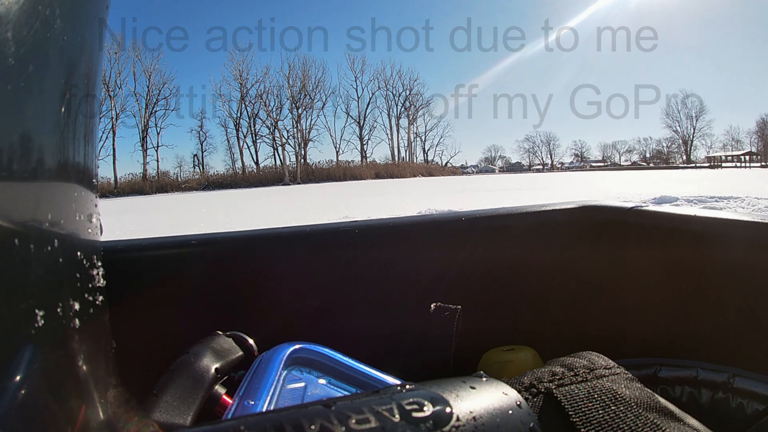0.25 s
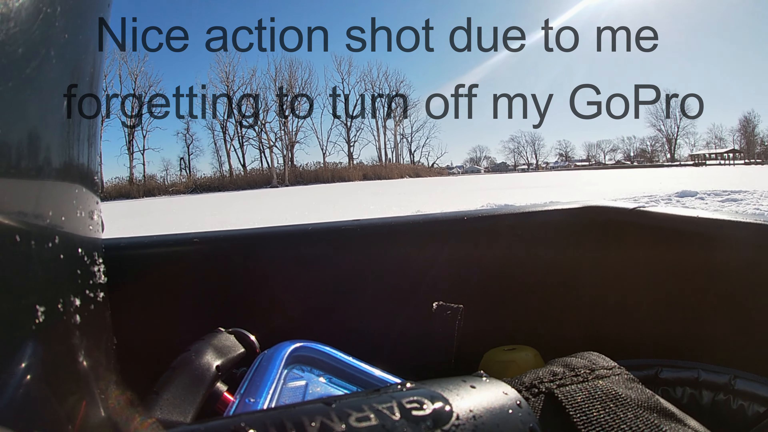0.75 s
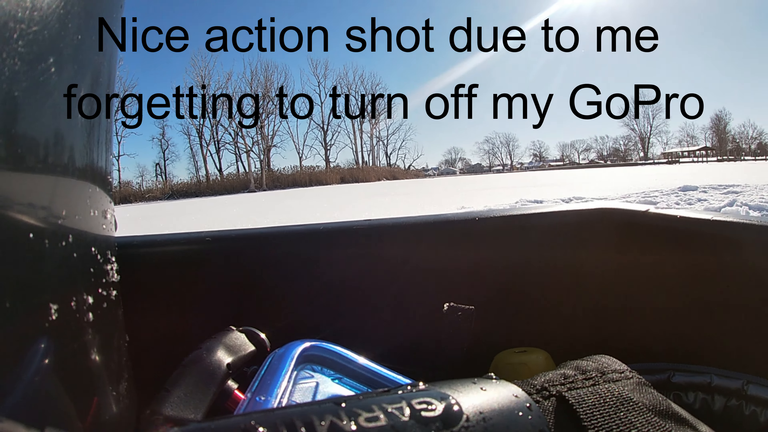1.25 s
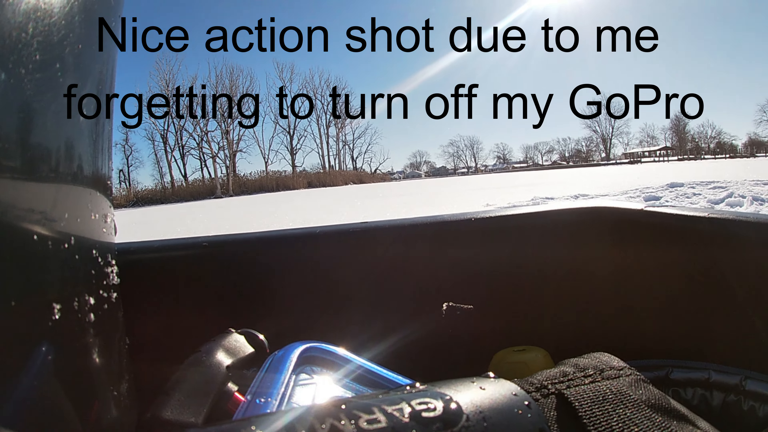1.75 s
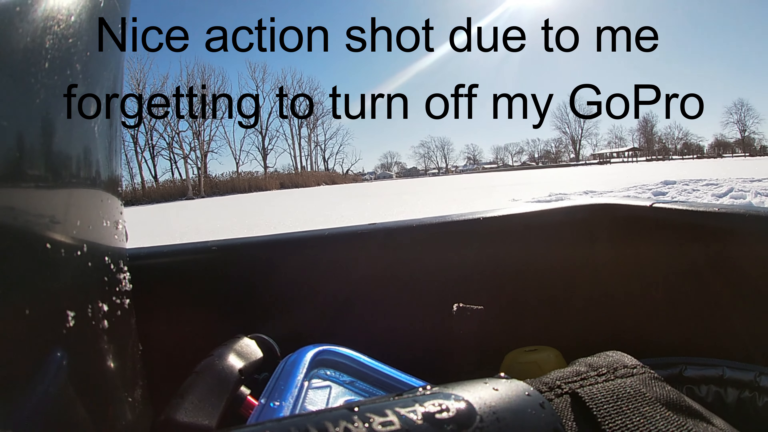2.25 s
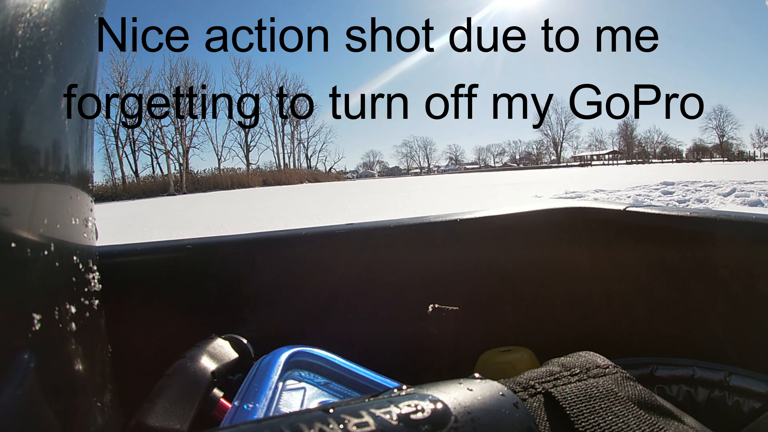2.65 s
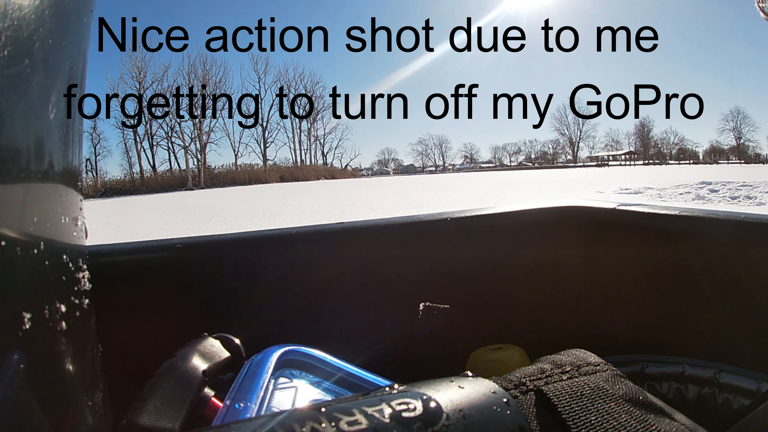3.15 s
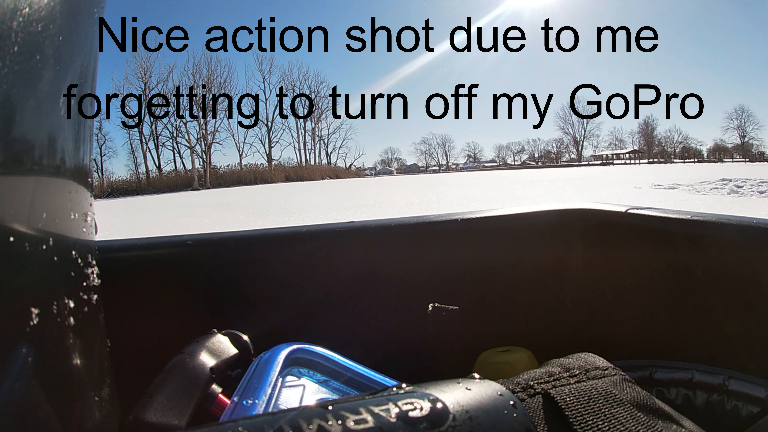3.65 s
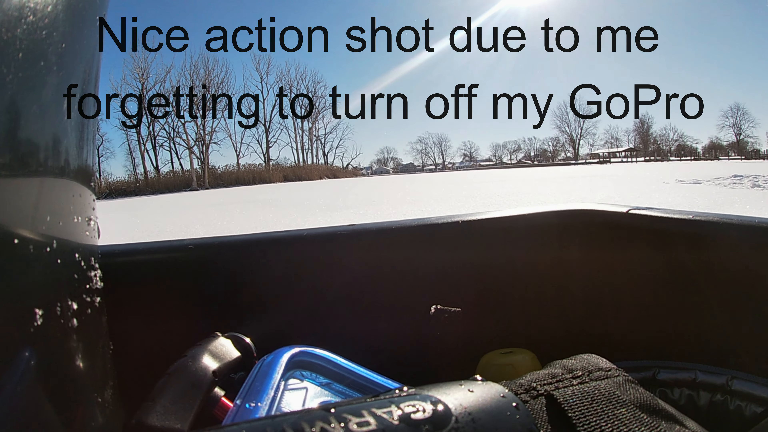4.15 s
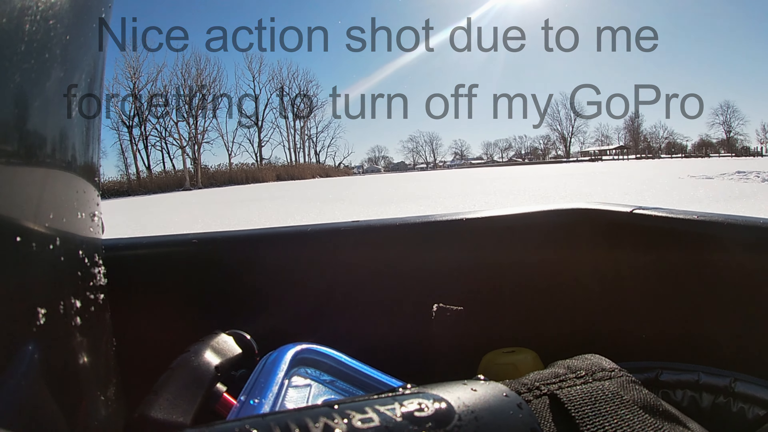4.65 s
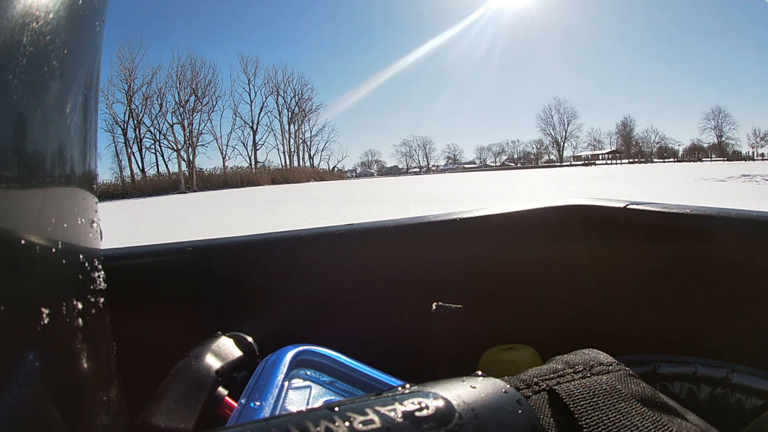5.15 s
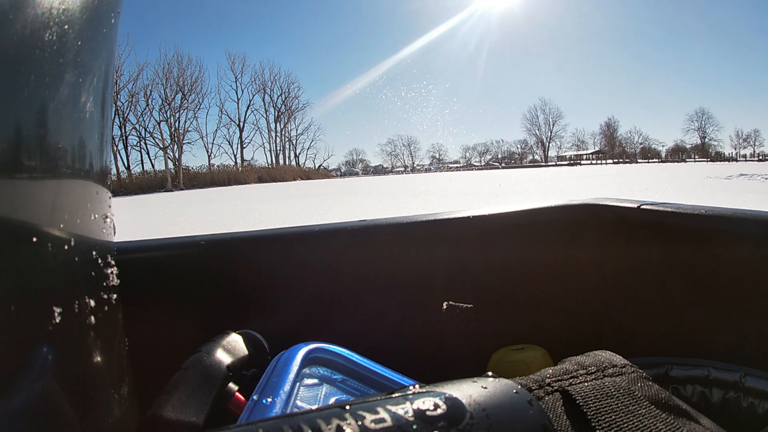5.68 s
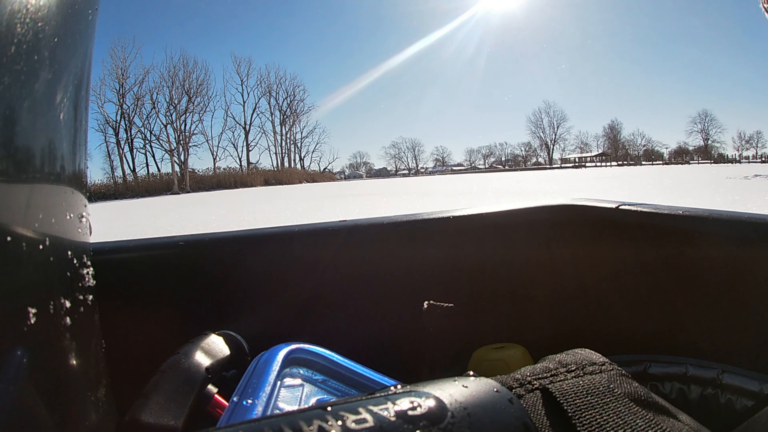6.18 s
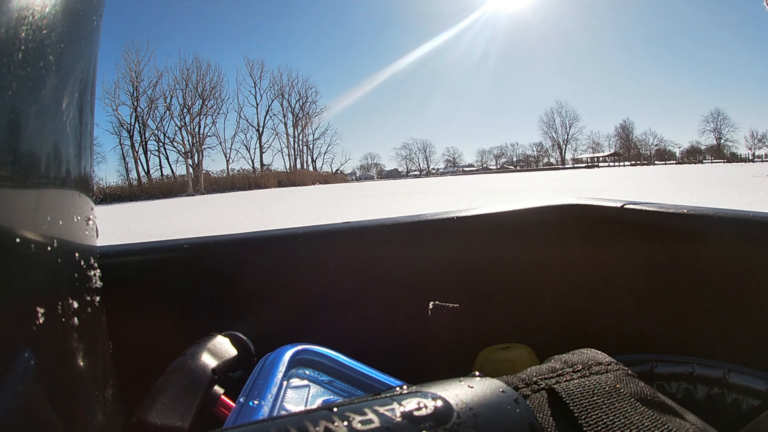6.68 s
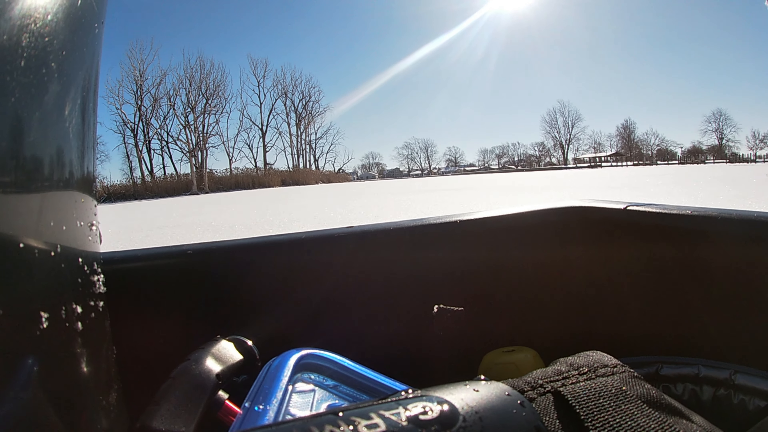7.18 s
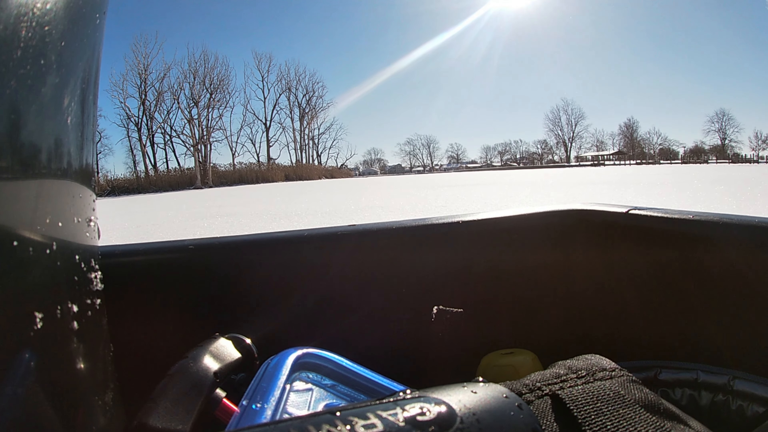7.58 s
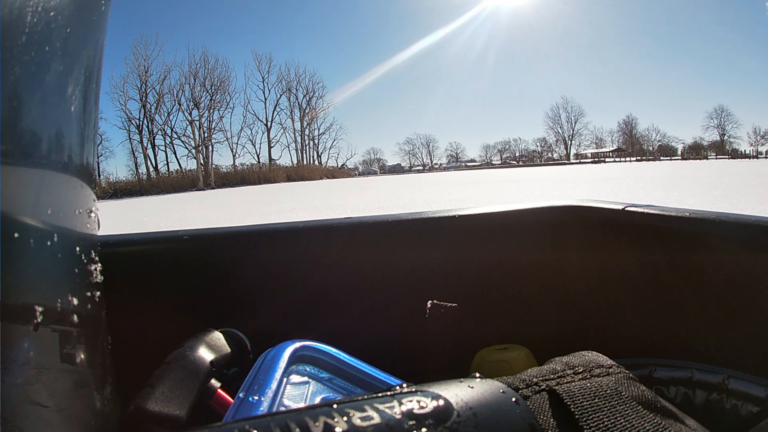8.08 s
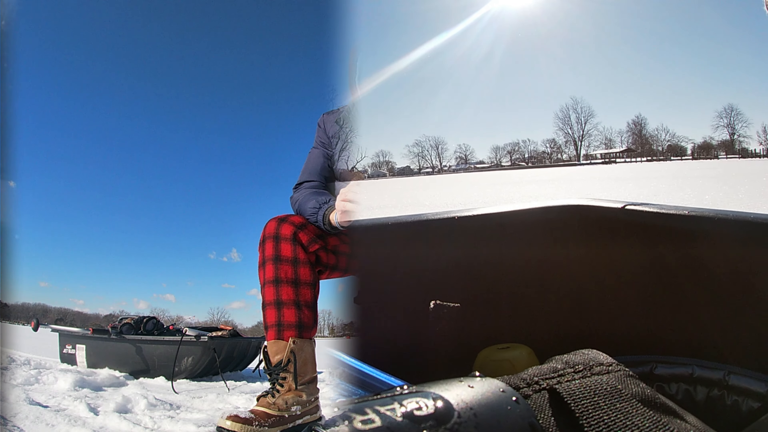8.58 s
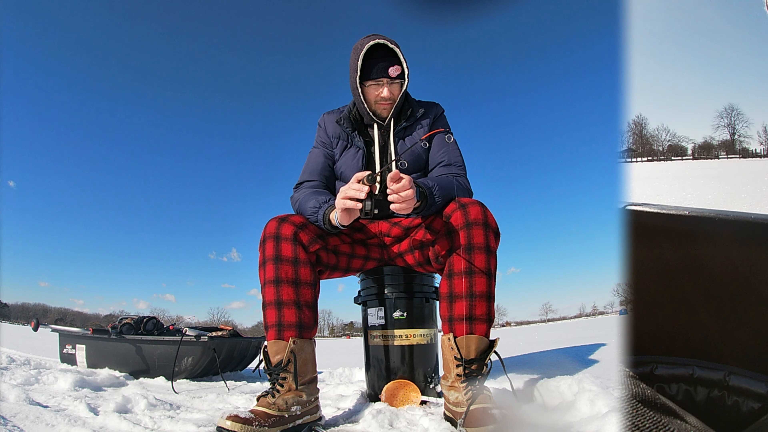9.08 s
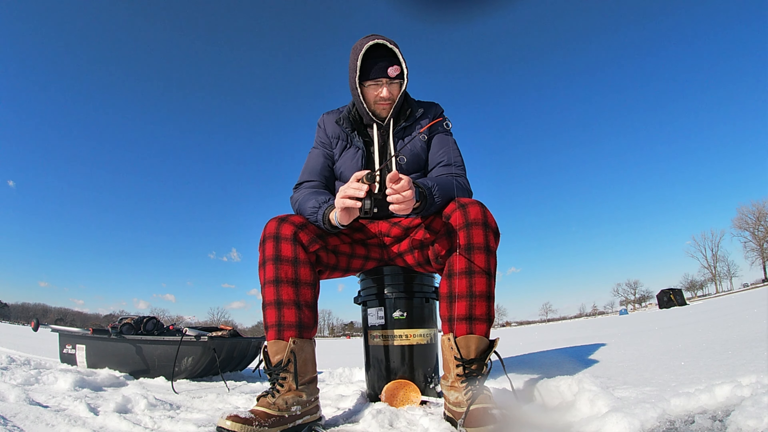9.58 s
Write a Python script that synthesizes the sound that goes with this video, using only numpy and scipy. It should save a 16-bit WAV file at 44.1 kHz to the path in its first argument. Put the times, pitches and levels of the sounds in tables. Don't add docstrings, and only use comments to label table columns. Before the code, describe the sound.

From 0 s the microphone sits inside a hard plastic sled being dragged over crusty snow. A loud, hollow low drone shakes unevenly, strongest around 200 to 400 hertz, with gritty scraping and a thinner icy hiss. Loose gear knocks the tub at roughly 0.4, 1.0, 1.4, 1.6, 2.1 and 2.7 s, with short boxy clacks and some bright rod rings. Sharper blows come at 3.9, 4.85, 5.6, 7.2 and 8.2 s, with a lighter one at 7.6; the hull shudders after thumps and scraping often ducks briefly. Ridges add dull jolts between. From 8.15 s the ride fades fast, cutting with a click at 8.72. After about 0.03 s of silence, only bassy wind buffets an exposed microphone on the ice, sagging and surging, with tearing flutters densest near 9.4 to 9.5 s, tiny ticks and a very faint rush, before cutting off abruptly around 9.8 s.

```python
import sys
import numpy as np
from scipy import signal
from scipy.fft import rfft, irfft, next_fast_len
from scipy.io import wavfile
from scipy.ndimage import uniform_filter1d

SR = 44100
rng = np.random.default_rng(int(sys.argv[2]) if len(sys.argv) > 2 else 0)


def convert_level_to_amplitude(level_db):
    exponent = np.asarray(level_db, float) / 20
    return 10 ** exponent


def materialize(psi):
    bounded = np.clip(np.atleast_2d(psi).T, -1, 1)
    quanta = np.round(bounded * 32767).astype(np.int16)
    wavfile.write(sys.argv[1], SR, quanta)


N = 433503

# f/Hz, density/dB per Hz
SLED_SPECTRUM = [(15, -43), (25, -8.5), (113, -12), (215, 2), (290, -4), (400, -6), (667, -18), (947, -17),
                 (1340, -25), (1760, -24.5), (2430, -31), (5300, -31), (7320, -43), (9850, -45.5),
                 (15600, -69.5)]
# f/Hz, width/Hz, boost/dB
HULL_MODES = [(172.6, 19, 0.5), (234.7, 46, 4), (296.7, 22, 6), (400, 67, 1.5), (970, 85, -2),
              (1550, 600, 2.5), (2175, 200, -2), (4040, 230, 2), (5200, 530, 0.5), (10100, 1700, 2)]
# t/s, speed/dB, load on the crust/dB, upper over lower hull modes/dB
HAUL = [(0, 4.5, 0.5, -0.5), (.2, 3, -1.5, 8), (.5, 3.5, -2, 10.5), (.9, 0.5, -1, 6.5), (1.35, 1.5, 1, 3),
        (1.9, -1.5, -1.5, 0.5), (2.4, -0.5, -2.5, -4), (3.0, -2, -3.5, -5.5), (3.2, 0, -1, -0.5),
        (3.5, .5, -1.5, -2.5), (4.25, 1.5, -0.5, -5), (4.6, -0.5, -3, 3), (5.2, -2, -3.5, -3),
        (5.4, 0, 1, 0), (6.1, -0.5, 0, 1.5), (6.5, 2.5, 0, -1.5), (7.7, 0.5, -0.5, 1.5), (8.7, 2.5, -1, 2)]
LAYER_DB = [-33.5, -22.5, -33.5, -38]
PER_SPEED = [.3, .1, 1.1, 0.57]
PER_LOAD = [0.8, 1.5, 0.16, 0.061]
PER_TENSION = [.3, 1, 0.45, 0.65]
PER_DUCK = [.3, .4, .9, 1.02]


def drag():
    speed_db, load_db, flex_db = curve(HAUL)
    tension_db, duck_db = tugs()
    fade_start_s, fade_db_per_s = 8.147, 21
    fade_db = -fade_db_per_s * np.maximum(np.arange(N) / SR - fade_start_s, 0)
    levels = []
    for db, a, b, c, d in zip(LAYER_DB, PER_SPEED, PER_LOAD, PER_TENSION, PER_DUCK):
        levels.append(db + a * speed_db + b * load_db + c * tension_db + d * duck_db + fade_db)
    thud_db, hull_db, scrape_db, hiss_db = levels
    ground = walk(30)
    lumps = grains(260, 2.2, 1.21)

    thud = even(colour(grains(66, 2.5, 0.89), SLED_SPECTRUM, [], 19, 161), 0.18, 0.28)
    thud = thud * (convert_level_to_amplitude(thud_db + 1.4 * walk(7.3)) + shudder())

    flex = convert_level_to_amplitude(flex_db / 2)
    lower = colour(lumps, SLED_SPECTRUM, HULL_MODES, 130, 250)
    upper = colour(lumps, SLED_SPECTRUM, HULL_MODES, 297, 600)
    tub = lower / flex + flex * upper
    hull = even(tub * convert_level_to_amplitude(2.6 * ground), 0.026, 0.29) * convert_level_to_amplitude(hull_db)

    scrape = colour(0.29 * lumps + grains(1500, 0.97, 2.6), SLED_SPECTRUM, HULL_MODES, 527, 2700)
    cavity_mode = (947, 120, 14)  # f/Hz, width/Hz, boost/dB
    cavity = colour(lumps, SLED_SPECTRUM, [cavity_mode], 780, 1300)
    scrape = scrape + cavity * convert_level_to_amplitude(-10 - 0.53 * flex_db)
    scrape = scrape * convert_level_to_amplitude(scrape_db + 0.31 * ground + 1.1 * walk(40))

    hiss = colour(grains(5000, 4.5, 2.1), SLED_SPECTRUM, HULL_MODES, 2030, 17000)
    hiss = hiss * convert_level_to_amplitude(hiss_db + 0.092 * ground + 0.6 * walk(60))
    return thud + hull + scrape + hiss


# t/s, build-up before/dB, slack after (negative stays taut)/dB, gain duck (negative lifts)/dB
TUGS = [
    (.97, 4.5, 0, -3),
    (1.62, 0.5, 3.5, -2),
    (2.07, 3.5, -3, 0.5),
    (2.18, 2, 1, -1.2),
    (2.745, 5, -3.5, 1),
    (3.894, 4.5, 2.5, 5.5),
    (4.84, 6, 1.5, -3.5),
    (5.59, -0.5, 7.5, -3.5),
    (7.15, 3, 2.5, -3.6),
    (8.17, 3.5, 1.5, -2),
]


def tugs():
    build_s, slack_s = 0.24, 0.55
    hold_s, release_s = 0.03, 0.045
    tension_db, duck_db = 0, 0
    t = np.arange(N // 32 + 1) * 32 / SR
    for s, before_db, after_db, depth_db in TUGS:
        d = t - s
        build = before_db * np.exp(-np.abs(d) / build_s)
        slack = -after_db * np.exp(-np.abs(d) / slack_s)
        tension_db = tension_db + np.where(d < 0, build, slack)
        duck_db = duck_db - depth_db * (d > 0) * np.exp(-np.maximum(d - hold_s, 0) / release_s)
    tension_db = uniform_filter1d(tension_db, size=45)
    duck_db = uniform_filter1d(duck_db, size=14)
    return curve(np.transpose([t, tension_db, duck_db]))


# t/s, tub level/dB, thump level/dB, box ring level/dB, rod ring level/dB
KNOCKS = [(.368, -11, -33, -32, -28), (.968, -8, -22.5, -22.5, -31), (1.359, -10, -34, -24, -38),
          (1.616, -23, -34, -25, -25), (1.625, -4.5, -18, -24, -40), (2.06, -6.5, -16.5, -15, -14),
          (2.14, -11, -30, -34, -38), (2.74, -5.5, -41, -15.5, -21.5), (3.875, -22, -33, -20, -20),
          (3.885, -7.5, -20.5, -14.5, -11.5), (4.843, -6, -11.5, -20, -15), (4.858, -9.5, -17, -21, -41),
          (5.581, -7, -12, -29, -33), (5.592, -1.5, -14, -27, -34), (5.631, -9.5, -23.5, -32, -41),
          (7.164, -1, -13.5, -26, -21), (7.176, -7.5, -31, -23, -37), (8.178, -3, -18, -25, -27),
          (8.188, -16, -18, -23, -27), (8.199, -7, -22, -26, -34), (2.757, -9.5, -37, -26, -36),
          (2.078, -8, -29, -20, -32), (7.615, -11.5, -18, -40, -46), (8.632, -34, -26.5, -48, -54)]
# f/Hz, t60/s, level/dB
KNOCK_RINGS = [
    [(173.8, 0.057, -2.5), (250, 0.039, -5.5), (326, 0.09, -12.5), (426, 0.19, -20)],
    [(74.5, 0.088, 3.5), (44.9, .15, -8), (106, 0.13, -2)],
    [(646, 0.01, -2), (871, 0.036, 0.5), (1062, 0.029, -4.5), (1250, 0.021, -21.5)],
    [(1635, 0.036, -12), (1720, 0.015, -5), (1970, 0.027, -1.5), (2206, 0.026, -11), (2750, 0.019, -18)],
]
KNOCK_LAG_MS = [1.15, 1.1, 1.6, 0.16]


def knocks():
    contact_ms = 2.9
    out = np.zeros(N)
    t = np.arange(SR // 5) / SR
    rise = 1 - np.exp(-(t * 1000 / contact_ms) ** 2)
    chance = rng.standard_normal((len(KNOCKS), len(KNOCK_RINGS), 12))
    crack = colour(rng.standard_normal(N), SLED_SPECTRUM, [], 300, 6000)
    for (s, *part_db), luck in zip(KNOCKS, chance):
        start = s - contact_ms / 2000
        for rings, level_db, lag_ms, c in zip(KNOCK_RINGS, part_db, KNOCK_LAG_MS, luck):
            for k, (ring_hz, t60, db) in enumerate(rings):
                shape = rise * np.exp(-np.log(1000) * t / t60)
                detuned_hz = ring_hz * (1 + 0.02 * c[k])
                ring = np.sin(2 * np.pi * detuned_hz * t + c[k + 6])
                add(out, start + lag_ms / 1000, convert_level_to_amplitude(level_db + db) * ring * shape / shape.max())
        shape = rise * np.exp(-np.log(1000) * t / 0.037)
        snap = crack[int(s * SR):][:len(t)]
        add(out, start, convert_level_to_amplitude(part_db[3] - 3.0) * snap * shape / shape.max())
    return out


# t/s, thump level/dB
RIDGES = [
    (.1, -10),
    (.6, -24),
    (1.5, -20),
    (3.65, -16.5),
    (4.2, -18),
    (5.3, -8),
    (5.95, -29),
    (6.65, -20.5),
    (6.98, -11),
    (7.8, -10),
]


def shudder():
    rumble_db, rumble_s, ridge_s = -18, 0.23, 0.07
    out = np.zeros(N)
    t = np.arange(SR) / SR
    for s, _, thump_db, *_ in KNOCKS:
        add(out, s, convert_level_to_amplitude(thump_db + rumble_db) * np.exp(-t / rumble_s) * np.minimum(t / 0.03, 1))
    for s, thump_db in RIDGES:
        swell = np.e * t / ridge_s * np.exp(-t / ridge_s) / 2
        add(out, s, convert_level_to_amplitude(thump_db + rumble_db) * swell)
    return out


# f/Hz, density/dB per Hz
WIND_SPECTRUM = [(15, -30), (25, -1.5), (70, 1), (128, -8.5), (192, -20.5), (216, -20.5), (241, -27.5),
                 (289, -33.5), (447, -50.5), (492, -56.5), (1200, -85.5), (1560, -116), (2640, -120)]
# f/Hz, density/dB per Hz
RUSH_SPECTRUM = [(290, -25), (500, -7), (1060, -11), (1430, -9), (2240, -17.5), (4300, -17), (9000, -21),
                 (11700, -60.5), (19800, -120)]
# t/s, peak level/dB, width/ms
EDDIES = [(8.783, -22, 2.7), (8.8735, -17, 3.4), (9.0077, -16, 3.7), (9.087, -18, 2.2), (9.0964, -16, 2.4),
          (9.121, -17, 3.7), (9.138, -13, 2.9), (9.3065, -17, 3.7), (9.3235, -14, 3.4), (9.386, -13, 2.5),
          (9.3925, -13, 2.6), (9.4334, -13, 4), (9.443, -11, 2.2), (9.4543, -10, 3.2), (9.47, -12, 2.8),
          (9.48, -13, 3), (9.513, -14, 4), (9.65, -17, 4), (9.764, -18, 2.2)]
# t/s, peak level/dB
TICKS = [
    (8.785, -60),
    (8.886, -59),
    (9.085, -48),
    (9.119, -53.5),
    (9.318, -55),
    (9.385, -51.5),
    (9.438, -52),
    (9.474, -60),
]


def wind():
    gust_db, tear_db = gust()
    swirl = even(colour(rng.standard_normal(N), WIND_SPECTRUM, [], 22, 280), 0.068, 0.56)
    swirl = unit(swirl + 0.1 * (swirl ** 2 - 1))
    out = swirl * convert_level_to_amplitude(gust_db)
    rush = colour(rng.standard_normal(N), RUSH_SPECTRUM, [], 450, 6000)
    out += rush * convert_level_to_amplitude(-80 + 0.3 * (gust_db + 27.5) + 2.5 * walk(40))
    torn = colour(grains(190, 3.0, 0.48), WIND_SPECTRUM, [], 260, 520)
    out += torn * convert_level_to_amplitude(tear_db + 10.0)

    t = np.arange(-SR // 50, SR // 50) / SR
    for s, db, width_ms in EDDIES:
        u = (t * 1000 / width_ms) ** 2
        add(out, s + t[0], convert_level_to_amplitude(db) * (1 - 1.4 * u) * np.exp(-u))
    for s, db in TICKS:
        add(out, s + t[0], convert_level_to_amplitude(db + 5) * np.exp(-np.abs(t) / 0.0001))
    # t/s, level/dB, f/Hz, width/s
    for s, db, hz, width_s in [(9.4505, -57, 2900, 0.0008), (9.478, -46, 720, 0.003)]:
        add(out, s + t[0], convert_level_to_amplitude(db) * np.sin(2 * np.pi * hz * t) * np.exp(-(t / width_s) ** 2))
    return out


# t/s, depth/dB, sag time/s
LULLS = [
    (8.758, 10, .02),
    (8.842, 14, 0.072),
    (8.975, 11, 0.12),
    (9.03, 6.5, .05),
    (9.6, 9.5, .11),
    (9.685, 13, 0.045),
]
# t/s, peak level/dB
TEARS = [
    (9.022, -54),
    (9.094, -42),
    (9.282, -43.5),
    (9.342, -41.5),
    (9.368, -38),
    (9.392, -41),
    (9.448, -27.5),
    (9.477, -37),
    (9.761, -39.5),
]


def gust():
    buffet_db, snap_s = -23, 0.029
    floor_db, rise_db_per_s, fall_db_per_s = -73, 651.5, 999
    t = np.arange(N) / SR
    lull_db = np.zeros(N)
    for s, depth_db, sag_s in LULLS:
        lull_db += depth_db * np.interp(t, [s - sag_s, s, s + snap_s], [0, 1, 0])
    bursts = [db - np.maximum((s - t) * rise_db_per_s, (t - s) * fall_db_per_s) for s, db in TEARS]
    return buffet_db - lull_db, np.maximum(np.max(bursts, axis=0), floor_db)


def grains(rate, spread_db, smooth):
    where = rng.random(N)
    size = rng.exponential(size=N)
    bed = rng.standard_normal(N)
    hits = (where < rate / SR) * np.sign(bed) * convert_level_to_amplitude(spread_db * np.minimum(size, 2))
    return unit(hits) + smooth * rng.standard_normal(N)


def colour(x, spectrum, modes, lo_hz, hi_hz):
    size = 2 * next_fast_len(N // 2 + 1)
    hz = np.arange(size // 2 + 1) * SR / size + 1
    points_hz, points_db = np.transpose(spectrum)
    db = np.interp(np.log(hz), np.log(points_hz), points_db)
    for centre_hz, width_hz, boost_db in modes:
        db = db + boost_db / (1 + (2 * (hz - centre_hz) / width_hz) ** 2)
    edges = 1 / np.sqrt((1 + (lo_hz / hz) ** 8) * (1 + (hz / hi_hz) ** 8))
    return unit(irfft(rfft(x, size) * convert_level_to_amplitude(db) * edges, size)[:N])


def even(x, span_s, share):
    power = uniform_filter1d(x ** 2, int(span_s * SR))
    return unit(x / power ** (share / 2))


def walk(rate):
    k = int(SR / rate)
    held = np.repeat(rng.standard_normal(N // 200), k)[:N]
    return uniform_filter1d(uniform_filter1d(held, k), k)


def curve(table):
    s, *columns = np.transpose(table)
    return [np.interp(np.arange(N) / SR, s, c) for c in columns]


def unit(x):
    return x / np.sqrt(np.mean(x ** 2))


def add(out, s, sound):
    i = int(s * SR)
    out[i:i + len(sound)] += sound[:N - i]


def scene():
    cut_s, resume_s = 8.72, 8.7532
    t = np.arange(N) / SR
    cut, resume = int(cut_s * SR), int(resume_s * SR)
    ride = drag() + knocks()
    air = wind()
    ride += (0.082 - ride[cut]) * np.exp(-np.abs(t - cut_s) / 0.00143)
    air += (-0.077 - air[resume]) * np.exp(-((t - resume_s) / 0.005) ** 2)
    air += (0.15 - air[-1]) * np.exp(-((t - t[-1]) / 0.0016) ** 2)
    return (ride * (t < cut_s) + air * (t >= resume_s))[None, :]


def top_cut(x):
    return signal.sosfilt(signal.butter(12, 15710, fs=SR, output="sos"), x)


def record(dry):
    rounded = 1.3 * np.tanh(dry / 1.3)
    return top_cut(rounded)


dry = scene()
out = record(dry)
materialize(out)
```